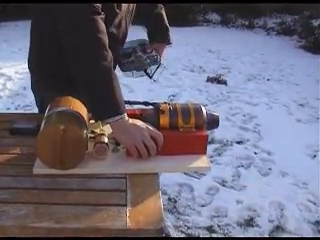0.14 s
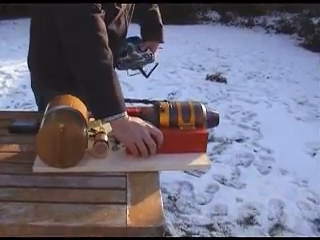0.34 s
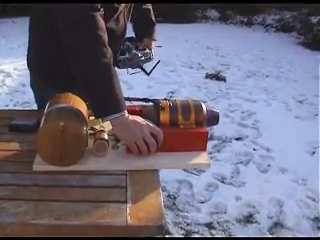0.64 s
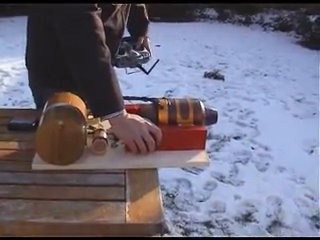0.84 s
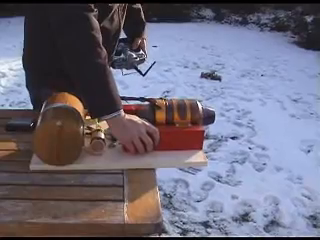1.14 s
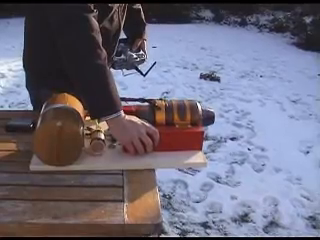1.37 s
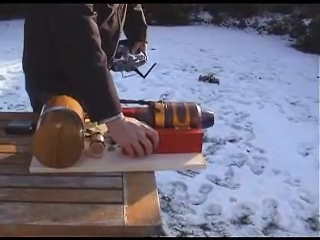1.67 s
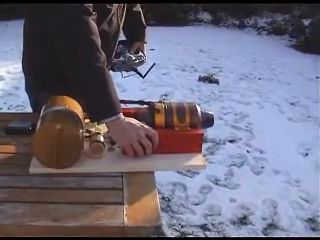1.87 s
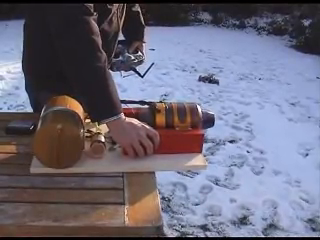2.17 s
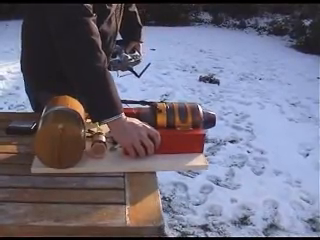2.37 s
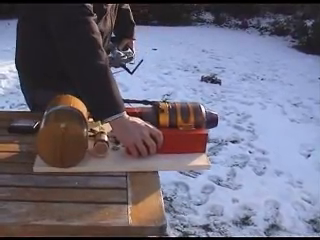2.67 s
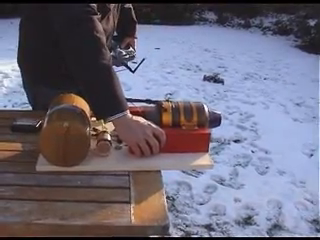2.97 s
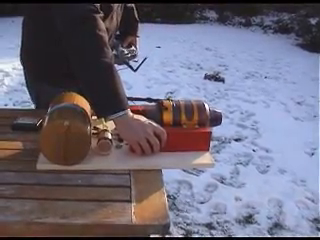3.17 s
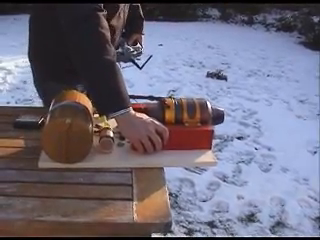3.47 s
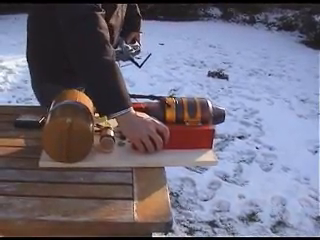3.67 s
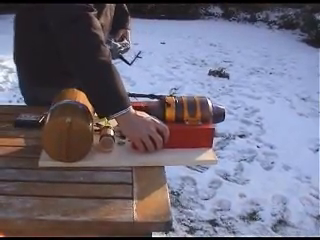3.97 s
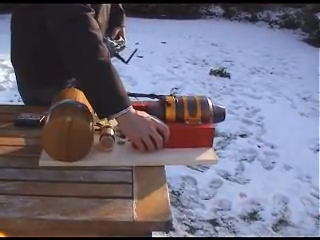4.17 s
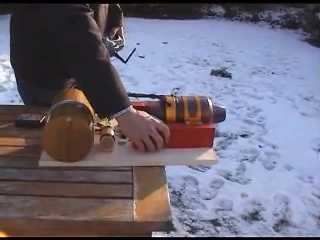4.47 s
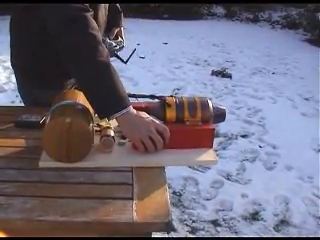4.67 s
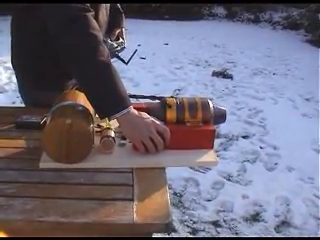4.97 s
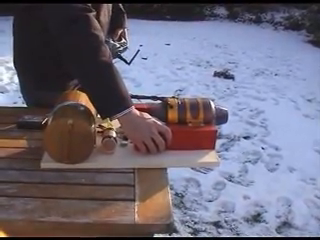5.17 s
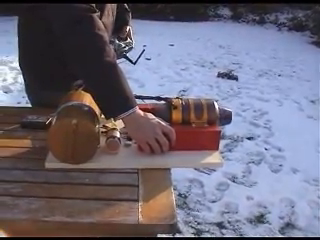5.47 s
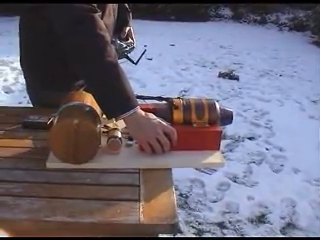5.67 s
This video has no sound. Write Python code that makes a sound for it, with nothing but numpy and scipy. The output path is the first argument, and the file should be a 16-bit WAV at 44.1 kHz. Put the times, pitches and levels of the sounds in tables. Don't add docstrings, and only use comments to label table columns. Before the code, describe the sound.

A small jet turbine runs close to the microphone outdoors. From 0 to 1 s it idles: a low, hollow flame roar centred around 300-600 Hz, light hiss, and thin whining tones near 1.1, 2.2 and 4.2 kHz. A small bright spit flicks at about 1.17 s. From 1.3 s the whine glides upward and the roar thickens, rising fast between 2 and 2.9 s into a dense, rough blast with added rumble, body and hiss. At 2.8 s it flares sharply, then chokes. The sound drops out almost completely at 2.92-3.0 s and again at 3.04-3.2 s, returning abruptly. From 3.2 to 5.8 s the loud roar stays nearly steady, fluttering and crackling, while the whine keeps climbing, its basic tone approaching 1.9 kHz and higher tones near 3.7 and 7 kHz. Peaks are flattened and the faint treble is dulled by the camera. It ends still running.

```python
import sys
import numpy as np
from scipy import signal
from scipy.fft import rfft, irfft, next_fast_len
from scipy.io import wavfile
from scipy.ndimage import uniform_filter1d, map_coordinates

SR = 44100
rng = np.random.default_rng(int(sys.argv[2]) if len(sys.argv) > 2 else 0)


def gain_from_db(level_db):
    decades = np.asarray(level_db, float) / 20
    return 10 ** decades


def dump_mix(stems):
    frames = np.atleast_2d(stems).T
    limited = np.clip(frames, -1, 1)
    pcm = np.round(limited * 32767).astype(np.int16)
    wavfile.write(sys.argv[1], SR, pcm)


N = 257544
BEARING = 3.84


def unit(x):
    return x / np.sqrt(np.mean(x ** 2) + 1e-20)


def along(points, hz):
    f, v = np.transpose(points)
    return np.interp(np.log(hz + 1), np.log(f + 1), v)


def over_time(points):
    s, v = np.transpose(points)
    return np.interp(np.arange(N) / SR, s, v)


def wobble(rate):
    coarse = np.arange(0, N + 16, 16)
    knots = rng.standard_normal(int(N * rate / SR) + 4)
    return np.interp(np.arange(N), coarse, map_coordinates(knots, [coarse * rate / SR]))


def filtered(x, response):
    m = next_fast_len(N + SR // 2)
    return irfft(rfft(x, m) * response(np.fft.rfftfreq(m, 1 / SR)), m)[..., :N]


# (time [s], speed [turns per s])
SHAFT_SPEED = [(0, 1085), (.5, 1084), (1, 1104), (1.4, 1143), (1.9, 1183), (2.1, 1199), (2.4, 1279),
               (2.7, 1356), (3.25, 1487), (3.6, 1552), (4.2, 1665), (4.6, 1724), (5, 1781), (5.4, 1831),
               (5.84, 1878)]


def shaft_speed():
    return over_time(SHAFT_SPEED)


# (time [s], power above idle [dB])
BURNER_POWER = [(0, -0.5), (.25, 1.5), (1, 3.5), (1.5, 5.5), (2, 8), (2.5, 12), (2.9, 14.5), (3.45, 14),
                (4.3, 13), (5.3, 13), (5.84, 12)]


def burner_power():
    return over_time(BURNER_POWER)


def throttle():
    return np.clip(0.2 + 0.058 * burner_power(), 0, .97)


# (delay [s], gain at idle, gain at full power)
FAR_ECHO = (.01145, -.24, -.03)
# (frequency [Hz], width [Hz], depth at idle [0-1], depth at full power [0-1])
CANCELLED = [(963.4, 126, 0.95, 0.75), (1270, 80, 0.2, 0.87), (1578, 93, 0.7, 0.59), (1875, 100, 0.6, 0.27),
             (2140, 64, 0, 0.9), (2430, 110, 0.77, 0.24), (2924, 57, 0, 0.4), (7950, 290, 0.1, 0.7),
             (10670, 500, 0.4, 0.7)]


def reflections(hz, share):
    delay, idle_gain, full_gain = FAR_ECHO
    echo_gain = idle_gain + share * (full_gain - idle_gain)
    path = 1 + echo_gain * (hz < 4500) * np.exp(-2j * np.pi * hz * delay)
    for centre, width, idle, full in CANCELLED:
        depth = np.clip(idle + share * (full - idle), 0, 1)
        path = path * (1 - depth / (1 + (2 * (hz - centre) / width) ** 2))
    return path


def turbulence(patchy_db):
    z = signal.stft(rng.standard_normal(N), nperseg=512)[2]
    patches = uniform_filter1d(rng.standard_normal(z.shape), size=5, axis=0)
    patches = uniform_filter1d(patches, size=6, axis=1)
    return signal.istft(z * gain_from_db(patchy_db * unit(patches)), nperseg=512)[1][:N]


def gas(idle, full, patchy_db):
    noise, share = turbulence(patchy_db), throttle()
    low = unit(filtered(noise, lambda hz: gain_from_db(along(idle, hz)) * reflections(hz, 0)))
    high = unit(filtered(noise, lambda hz: gain_from_db(along(full, hz)) * reflections(hz, 1)))
    return (1 - share) * low + share * high


# (frequency [Hz], level [dB per Hz])
RUMBLE_AT_IDLE = [(13, -68), (22, -36.5), (65, -14), (140, -6), (150, -2), (200, -29), (330, -120)]
RUMBLE_AT_FULL = [(13, -48), (22, -22), (65, -3), (150, 1), (200, -33), (330, -120)]


def rumble(level_db):
    return gain_from_db(level_db + 1.1 * wobble(12)) * gas(RUMBLE_AT_IDLE, RUMBLE_AT_FULL, patchy_db=-1.0)


# (frequency [Hz], level [dB per Hz])
ROAR_AT_IDLE = [(82, -63), (140, -32.5), (201, -15.5), (236, -19.5), (328, -6), (354, -9), (382, -4),
                (415, -5), (588, -15), (740, -30), (960, -54.5), (1630, -120)]
ROAR_AT_FULL = [(82, -50), (140, -21), (287, -2), (398, -3.5), (439, -6.5), (480, -3), (515, 2),
                (605, -6.5), (695, -15), (740, -32), (960, -38), (1630, -120)]


def roar(level_db, flutter):
    return gain_from_db(level_db + 0.45 * flutter) * gas(ROAR_AT_IDLE, ROAR_AT_FULL, patchy_db=0.2)


# (frequency [Hz], level [dB per Hz])
BODY_AT_IDLE = [(700, -120), (720, 0.5), (850, -3.5), (1100, -8.5), (1700, -8), (1950, -14.5), (2300, -13),
                (2650, -10), (3000, -8.5), (3600, -17), (4300, -16), (4700, -29), (5100, -45), (5300, -120)]
BODY_AT_FULL = [(700, -120), (720, -3.5), (850, 2.5), (1100, -0.5), (1400, -4.5), (1900, -12),
                (2600, -12.5), (3400, -15), (4000, -18.5), (4700, -19), (5150, -30.5), (5200, -120)]


def jet_body(level_db, flutter):
    return gain_from_db(level_db - 0.63 + 0.94 * flutter) * gas(BODY_AT_IDLE, BODY_AT_FULL, patchy_db=0.3)


# (frequency [Hz], level [dB per Hz])
HISS_AT_IDLE = [(4900, -120), (5050, -5), (5600, -10.5), (6100, -1.5), (6900, -8), (7700, -7), (9000, -8.5),
                (10500, -0.5), (11500, -0.5), (12600, -3.5), (13000, -120)]
HISS_AT_FULL = [(5100, -120), (5150, -13.5), (5400, -5), (6900, 0.5), (7500, -2), (8600, -4), (10000, -3.5),
                (11500, -5.5), (12600, -22), (13000, -120)]


def jet_hiss(level_db, flutter):
    crackle = 0.65 * wobble(90) + 0.86 * wobble(350)
    return gain_from_db(level_db + 0.85 * flutter + crackle) * gas(HISS_AT_IDLE, HISS_AT_FULL, patchy_db=0.3)


# (frequency [Hz], width [Hz], level [dB])
MOUNT_MODES = [(1110, 200, -36), (1180, 230, -35.5), (1580, 190, -32), (2703, 250, -22), (3000, 280, -38.5),
               (3400, 360, -30), (3540, 340, -32.5), (3900, 590, -36), (4560, 500, -38), (5780, 320, -32.5),
               (6180, 260, -33.5), (6450, 200, -37.5), (6800, 300, -31.5), (6980, 210, -24)]


def mount(hz):
    power = 0
    for centre, width, db in MOUNT_MODES:
        power = power + gain_from_db(2 * db) / (1 + (2 * (hz - centre) / width) ** 2) ** 3
    return 10 * np.log10(power)


GAS_AT_IDLE = (-50, -18, -32.5, -42)
GAS_GROWTH = (0.69, .6, .97, 0.38)
# (time [s], level [dB], length [s])
FLAME_SURGES = [
    (2.8, 2.5, .012),
    (2.9, -5, .012),
    (1.79, 1.5, 0.092),
    (3.45, 0.9, 0.18),
]


def flow_levels():
    t, burn_db, speed = np.arange(N) / SR, burner_power(), shaft_speed()
    surge_db = sum(db * np.exp(-((t - s) / length) ** 2) for s, db, length in FLAME_SURGES)
    levels = [idle + grow * burn_db for idle, grow in zip(GAS_AT_IDLE, GAS_GROWTH)]
    rumble_db, roar_db, body_db, hiss_db = levels
    rough_from_db = 12.5
    rough = 1 / (1 + np.exp(-1.6 * (np.maximum.accumulate(burn_db) - rough_from_db)))
    rumble_db = rumble_db + 8.5 * rough
    top_hz, width, _ = MOUNT_MODES[-1]
    rattle_db = 3.5 / (1 + (2 * (BEARING * speed - top_hz) / width) ** 2)
    hiss_db = hiss_db + 3.5 * rough + 0.5 * np.log2(speed / speed[0]) + rattle_db
    return rumble_db, roar_db + surge_db, body_db + 0.56 * surge_db, hiss_db + .8 * surge_db


def exhaust():
    rumble_db, roar_db, body_db, hiss_db = flow_levels()
    flutter = wobble(45)
    flame = rumble(rumble_db) + roar(roar_db, flutter)
    return flame + jet_body(body_db, flutter) + jet_hiss(hiss_db, flutter)


# (order [cycles per turn], level against the mount [dB], change from idle to full [dB])
SHAFT_TONES = [
    (1, 0, 0),
    (2, 0, 0),
    (3, -8, 0),
    (BEARING, -7, 0),
]
# (order [cycles per turn], level [dB])
BLADE_TONES = [(3.5, -55), (4, -50), (4.5, -53), (5, -49), (5.5, -51), (6, -52), (6.5, -52), (7, -53),
               (7.5, -56), (8, -62), (8.5, -62), (9.5, -57)]
# (speed [turns per s], level [dB])
BLADE_WHINE = [(1085, 1), (1125, -5), (1185, -5), (1240, 2), (1340, 5), (1400, 0), (1660, 2), (1750, -1)]
# (frequency [Hz], level [dB])
CASING_LEAK = [(3500, -2), (4400, -9), (5100, -15), (5500, -9), (5900, 1), (6600, 3), (7100, 2), (7600, -6),
               (8300, -6), (9500, -7), (12000, -9)]


def rotor():
    speed, share = shaft_speed(), throttle()
    angle = 2 * np.pi * np.cumsum(uniform_filter1d(speed, size=6000)) / SR + 0.056 * wobble(40)

    def tone(order, db, blur):
        level = np.sqrt(2) * gain_from_db(db + 0.54 * wobble(14))
        return level * np.sin(order * angle + .4 * wobble(10) + blur * wobble(150))

    tones = np.zeros(N)
    for order, db, change_db in SHAFT_TONES:
        level_db = db + change_db * share + mount(order * speed) + 0.76 * wobble(6)
        tones += tone(order, level_db, blur=.08)
    whine_db = along(BLADE_WHINE, speed)
    for order, db in BLADE_TONES:
        level_db = db + whine_db + along(CASING_LEAK, order * speed) + 1.1 * wobble(3)
        tones += tone(order, level_db, blur=.4)
    return tones


# (time [s], level [dB], length [s])
FUEL_SPITS = [
    (1.165, -31, .013),
]
# (frequency [Hz], level [dB])
SPIT_COLOUR = [(2500, -30), (3500, 9.5), (6500, -1.5), (9000, -21), (12000, -25)]


def puffs():
    t, shape = np.arange(N) / SR, np.zeros(N)
    for s, db, length in FUEL_SPITS:
        rise = np.clip((t - s) / length + 0.21, 0, None)
        shape += 3 * gain_from_db(db) * rise * np.exp(-np.abs(t - s) / length * 2.2)
    return shape * unit(filtered(rng.standard_normal(N), lambda hz: gain_from_db(along(SPIT_COLOUR, hz))))


# (frequency [Hz], in-phase part, lagging part, unrelated part)
PORT_DIFFERENCE = [(149.6, 0, 0.095, .004), (290, 0, 0.035, 0.014), (499, 0, .012, 0.0073),
                   (820, 0, .04, .03), (1200, .1, 0.15, 0.12), (1490, -0.037, .38, 0.19),
                   (1805, -0.4, 0.34, 0.27), (1950, -.1, 0.1, .15), (2070, -0.48, .05, 0.29),
                   (2330, -0.091, 0.011, 0.041), (2930, 0.055, -0.16, 0.068), (3380, 0.15, .01, .03),
                   (3970, .12, 0, 0.041), (4100, 0, 0, .01)]


def scene():
    mid = exhaust() + rotor() + puffs()
    f, same, lag, other = np.transpose(PORT_DIFFERENCE)
    hz, _, z = signal.stft(mid, SR, nperseg=1024)
    scatter = np.exp(2j * np.pi * rng.random(z.shape)) * 2
    ratio = np.interp(hz, f, same - 1j * lag)[:, None] + np.interp(hz, f, other)[:, None] * scatter
    side = signal.istft(z * ratio, SR, nperseg=1024)[1][:N]
    return np.array([mid + side, mid - side])


LIMIT_HZ = 12500
# (time [s], step [Hz], hold [s])
LIMIT_CUTS = [
    (1.8, 420, .2),
    (2.0, 780, .4),
    (3.05, 740, .5),
]


def band_limit(t):
    cuts = []
    for s, hz, hold in LIMIT_CUTS:
        healing = np.exp(-(np.clip(t - s - hold, 0, None) / .75) ** 1.5)
        cuts.append(hz * (t > s) * healing)
    share = np.interp(t, np.arange(N) / SR, throttle())
    return np.maximum(LIMIT_HZ - 330 * share ** 2 - np.max(cuts, axis=0), 11500)


# (from [s], to [s], level [dB])
LOSS_TIMES = [
    (1.25, 1.95, 4.8),
    (2.02, 2.5, 4.5),
    (2.5, 5.84, 2),
]


def camera_losses(pair):
    hz, t, z = signal.stft([pair[0] + pair[1], pair[0] - pair[1]], SR, nperseg=2048)
    power = np.abs(z) ** 2
    loud = uniform_filter1d(power[0].sum(axis=0), size=15)
    limit = band_limit(t)
    loss_db = 4.5 * (LIMIT_HZ - limit) / 1000
    for start, end, db in LOSS_TIMES:
        loss_db = loss_db + db * (t > start) * (t < end)
    masking_db = along([(3000, -2), (5250, 0), (5500, -4), (8000, -5), (12000, -7)], hz)[:, None]
    side_db = along([(200, -43), (900, -46), (2200, -47), (2800, -51), (4200, -53), (5000, -45)], hz)[:, None]
    faint_db = np.array([-60 + loss_db + masking_db, side_db + .4 * loss_db])
    nearby = uniform_filter1d(uniform_filter1d(power, size=3, axis=1), size=3, axis=2)
    kept = (nearby > loud * gain_from_db(2 * faint_db)) * (hz[:, None] < limit)
    mid, side = signal.istft(z * kept, SR, nperseg=2048)[1][:, :N] / 2
    return np.array([mid + side, mid - side])


# (from [s], to [s])
LOST_SOUND = [
    (2.9182, 2.9965),
    (3.0378, 3.1968),
]


def dropouts():
    t, gain = np.arange(N) / SR, np.ones(N)
    for start, end in LOST_SOUND:
        smear = gain_from_db(-20 - 780 * (t - start)) * (t < start + .038)
        ahead = gain_from_db(-17 - 4000 * np.abs(end - t)) * (t > end - .004)
        gain = np.where((t > start) & (t < end), smear + ahead, gain)
    return gain


def low_pass(x):
    return signal.sosfilt(signal.butter(12, 17500, fs=SR, output="sos"), x)


def record(dry):
    saturated = dry / (1 + np.abs(dry / 1.07) ** 10) ** (1 / 10)
    played = camera_losses(saturated) * uniform_filter1d(dropouts(), size=30)
    return low_pass(np.clip(played, -.995, .995))


dry = scene()
out = record(dry)
dump_mix(out)
```